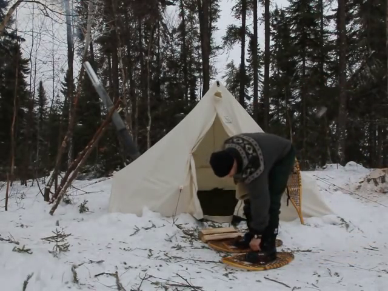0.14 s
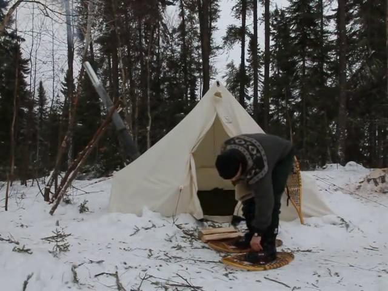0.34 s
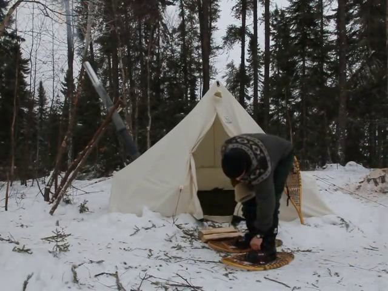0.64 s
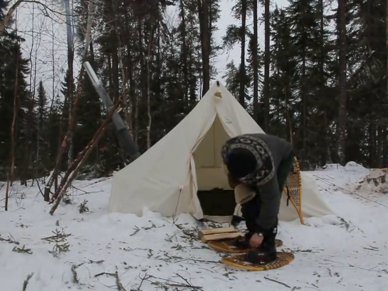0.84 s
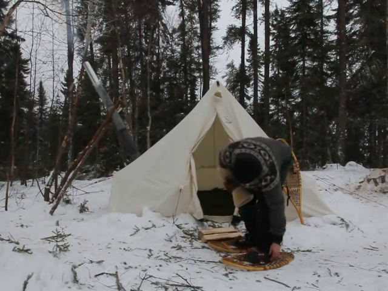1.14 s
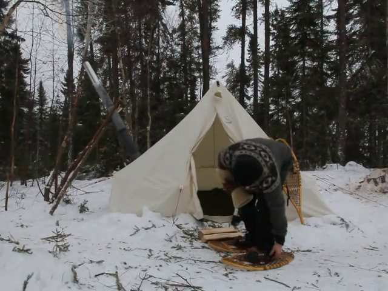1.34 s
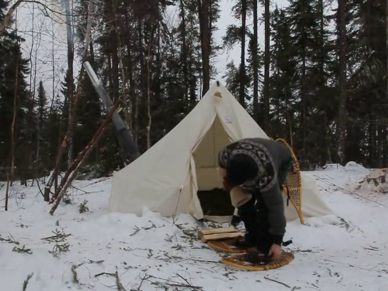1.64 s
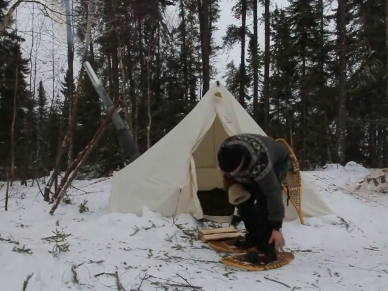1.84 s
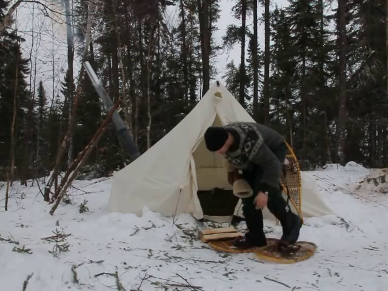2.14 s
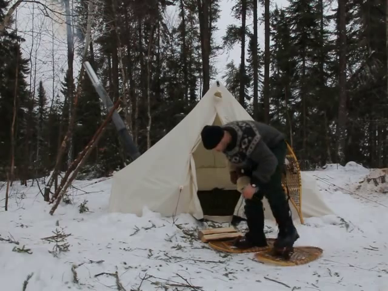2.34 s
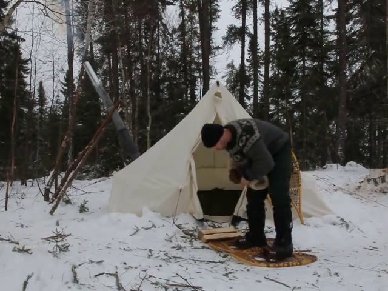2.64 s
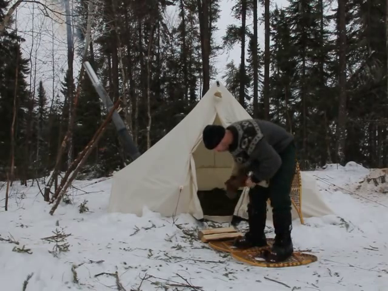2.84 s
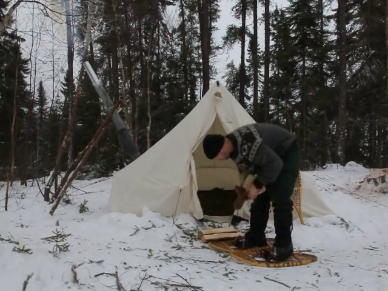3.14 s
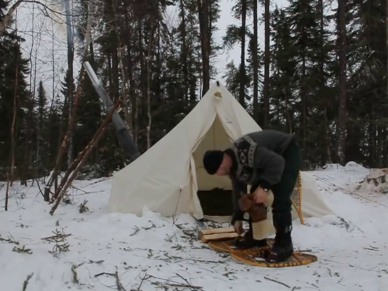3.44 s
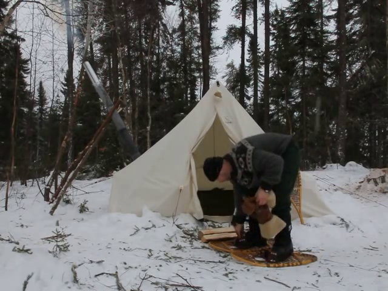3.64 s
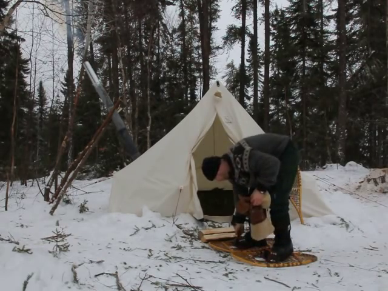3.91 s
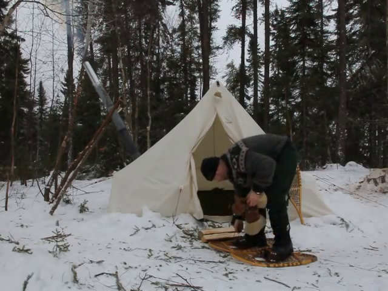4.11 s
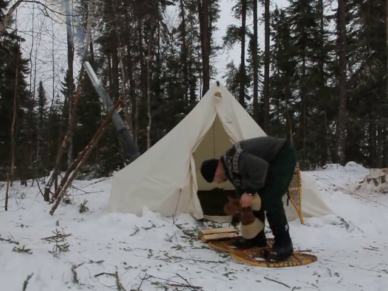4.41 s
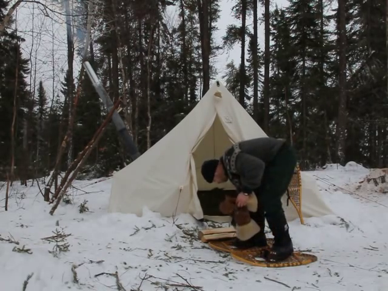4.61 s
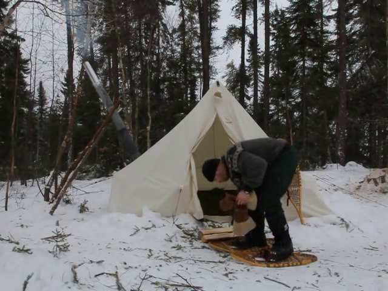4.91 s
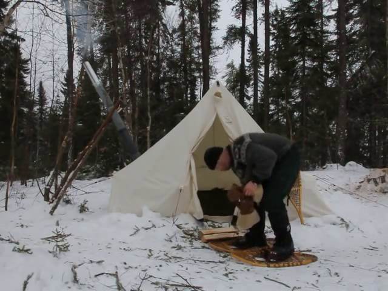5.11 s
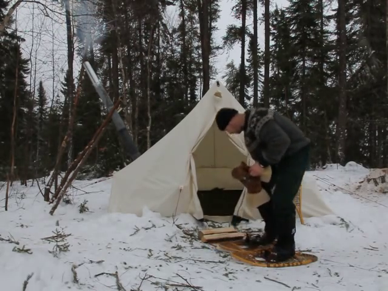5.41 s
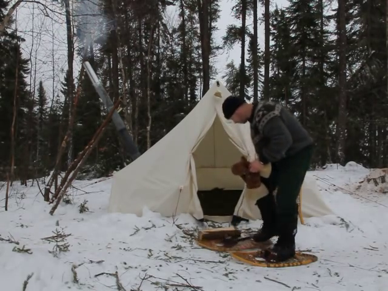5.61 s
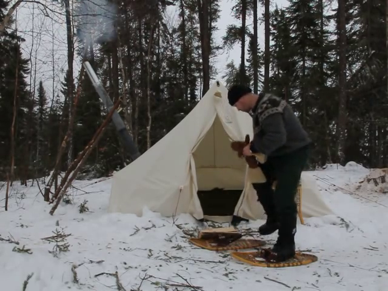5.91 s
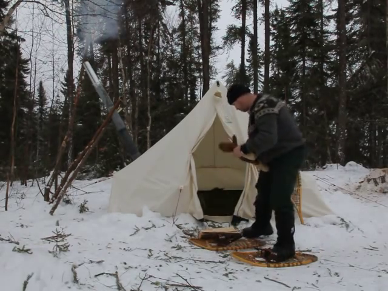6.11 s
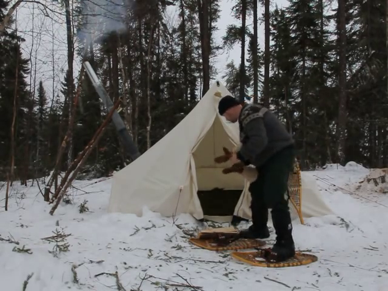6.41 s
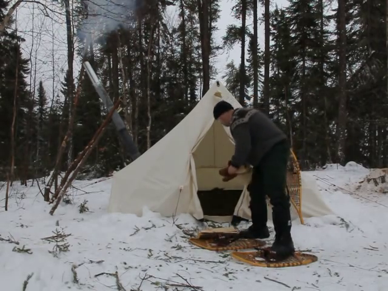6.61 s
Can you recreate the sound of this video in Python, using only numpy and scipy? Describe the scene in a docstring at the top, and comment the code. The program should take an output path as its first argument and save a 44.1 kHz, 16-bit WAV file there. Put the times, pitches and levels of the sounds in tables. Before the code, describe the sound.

Close to the microphone, a snowshoe rocks faintly on snow with light scrapes and small clicks, then sharper binding snaps. A crunchy, hissing shuffle follows, then a quieter stretch of sparse ticks and a soft cloth brush. A second shuffle brings a hard crack and hollow wooden knocks before smaller steps settle. Still, snowy forest, almost no echo.

```python
"""A light scrape and a faint creak of snow come first, close to the microphone, over a soft forest hush.
Someone fastens wooden snowshoes by a tent in a still winter forest, then shuffles round on them.
Frames and bindings snap under load (filtered bursts of grains); crust crunches and powder hisses under
the webbing (coloured grains that follow the feet); clothes brush past (swelling noise); each frame knocks
once (decaying sine modes). The snow swallows almost every echo: only a faint scatter returns."""
import sys
import numpy as np
from scipy import signal
from scipy.fft import rfft, irfft
from scipy.io import wavfile

SR = 44100
rng = np.random.default_rng(int(sys.argv[2]) if len(sys.argv) > 2 else 0)


def put_to_file(sound):
    """Save the sound as 16-bit audio at rate SR, in the file named by the first command-line argument."""
    columns = np.atleast_2d(sound).T  # one column per channel
    safe = np.clip(columns, -1, 1)
    whole_steps = np.round(safe * 32767)
    wavfile.write(sys.argv[1], SR, whole_steps.astype(np.int16))


N = 298116  # samples


def gain_of(db):
    """Decibels to an amplitude factor."""
    return 10 ** (np.asarray(db) / 20)


def evened(x):
    """Scales to rms 1."""
    return x / np.sqrt(np.mean(x ** 2) + 1e-20)


def read(points, hz):
    """Reads a table along a log-frequency axis."""
    point_hz, value = np.transpose(points)
    return np.interp(np.log(hz + 1), np.log(point_hz + 1), value)


def add(mix, start_s, sound):
    """Mixes a sound in at its start time."""
    part = mix[max(round(start_s * SR), 0):][:len(sound)]
    part += sound[:len(part)]


def band(x, low_hz, high_hz, order=2):
    """Causal band-pass; the upper edge stays at least a tenth above the lower."""
    edges = np.clip([low_hz, max(high_hz, low_hz * 1.1)], 10, SR / 2 - 100)
    return signal.sosfilt(signal.butter(order, edges, "band", fs=SR, output="sos"), x)


def coloured(x, spectrum, size=2048):
    """Minimum-phase colour: clicks keep their sharp fronts."""
    hz = abs(np.fft.fftfreq(size, 1 / SR))
    log_gain = np.log(gain_of(read(spectrum, hz)))
    response = np.exp(np.conj(signal.hilbert(log_gain)))
    return signal.oaconvolve(x, np.fft.ifft(response).real)[:len(x)]


def wander(rate_hz):
    """Smooth random drift of rms 1, with nothing faster than rate_hz."""
    slow = np.fft.rfftfreq(N, 1 / SR) < rate_hz
    return evened(irfft(rfft(rng.standard_normal(N)) * slow, N))


def grains(count, per_s, spread_db):
    """Random tiny fractures of either sign, a few much larger than the rest."""
    when, size, sign = rng.random((3, count))
    hit = when < per_s / SR
    out = np.zeros(count)
    excess = np.minimum(-np.log1p(-size[hit]), 3.5)  # exponential chance, capped
    out[hit] = np.sign(sign[hit] - 0.5) * gain_of(spread_db * excess)
    return out


def hush():
    """Soft even air noise with a few faint, fuzzy resonances."""
    # colour of the still air: hz, db_per_hz (relative)
    air_colour = [(25, -44), (70, -13), (120, -10), (200, -3.5), (330, -3), (570, 3), (950, -7),
                  (1800, -8.5), (2900, -14), (5000, -19), (6500, -17.5), (8500, -15.5), (12000, -20.5),
                  (16000, -27)]
    # faint resonances: centre_hz, width_hz, level_db (rms)
    air_tones = [(1390, 100, -60), (2450, 160, -68), (3480, 120, -64.5)]
    level_db = -56.5  # rms
    air = gain_of(level_db) * evened(coloured(rng.standard_normal(N), air_colour))
    for hz, width_hz, db in air_tones:
        tone = band(rng.standard_normal(N), hz - width_hz / 2, hz + width_hz / 2)
        air += gain_of(db) * evened(tone)
    return air


def forest(x):
    """Thin scatter from trunks and canvas, each band dying at its own speed."""
    # how long the trees hold an echo: hz, t60_s
    echo_times = [(150, 0.27), (1200, 0.1), (5000, 0.076), (15000, 0.21)]
    hz, t, bins = signal.stft(grains(SR // 2, 2300, 1.0), SR, nperseg=256)
    decay_db = -60 * t / read(echo_times, hz)[:, None]
    tail = signal.istft(bins * gain_of(decay_db), SR, nperseg=256)[1]
    return signal.fftconvolve(x, tail / np.linalg.norm(tail))[:N]


def swish(row):
    """Fibres rub too finely to be heard singly; the level follows the speed of the arm."""
    start, fastest, end, db, low_hz, high_hz = row
    t = start + np.arange(SR // 2) / SR
    speed = np.interp(t, [start, fastest, end], [0, 1, 0])
    fibres = band(grains(len(t), 14000, 4.2), low_hz, high_hz, order=1)
    rubbing = evened(band(fibres, 74, high_hz * 0.82, order=1))
    return gain_of(db) * speed ** 0.84 * rubbing


def frame(modes, knocks, push_s=0.00178):
    """A blunt push, then the bent wood rings on; the slim frame radiates no deep bass."""
    out, t = np.zeros(N), np.arange(SR // 3) / SR
    ring = sum(gain_of(db - 60 * t / t60) * np.sin(2 * np.pi * hz * t) for hz, db, t60 in modes)
    for start_s, ring_db, push_db, push_hz in knocks:
        push = np.sin(2 * np.pi * push_hz * t) * np.exp(-(t / push_s - 1) ** 2)
        add(out, start_s, gain_of(ring_db) * ring + gain_of(push_db) * push)
    return band(out, 250, 9000)


def footwork():
    """Crunch, hiss and powder gains over time; rest, rocking swells and three moves add as power."""
    # a planted snowshoe rocks while its straps are pulled: middle_s, length_s, crunch_db, hiss_db
    rocks = [(0.01, 0.12, -47, -45.5), (0.162, 0.17, -59, -50), (0.319, 0.14, -56, -49.5),
             (0.652, 0.25, -47, -46), (1.097, 0.16, -50, -47.5), (1.178, 0.11, -57, -44),
             (1.273, 0.3, -55, -52.5), (1.47, 0.38, -48.5, -45), (2.955, 0.19, -48.5, -54),
             (3.25, 0.47, -58.5, -57.5), (3.693, 0.27, -56.5, -49), (3.898, 0.081, -59, -50.5),
             (4.196, 0.16, -52.5, -56), (4.316, 0.066, -49, -51), (4.786, 0.064, -61, -46.5),
             (4.93, 0.15, -51, -49)]
    # moves of the feet: time_s, crunch_db under weight, sliding hiss_db, powder_db (relative to the slide)
    step_out = [(1.63, -56, -51, 2), (1.7, -49, -43.5, -9), (1.79, -38.5, -34.5, -5),
                (1.88, -39.5, -40.5, -3), (1.95, -40, -30.5, 0), (2.04, -35, -33.5, -3.5),
                (2.1, -35, -41.5, 6), (2.19, -36, -35, 2.5), (2.23, -41.5, -35.5, 5.5),
                (2.32, -36, -31.5, -2.5), (2.4, -47.5, -38, 0.5), (2.45, -34, -42, 0),
                (2.52, -42.5, -39.5, 1), (2.58, -35.5, -33.5, -7), (2.62, -41, -41.5, -3),
                (2.69, -42, -40.5, -4), (2.85, -47, -49, 0), (2.91, -58, -62, -10)]
    # same columns
    step_round = [(5.02, -65, -61, -1), (5.08, -41, -35, -5.5), (5.12, -46, -48.5, -6),
                  (5.16, -40, -32.5, -5), (5.23, -41.5, -38.5, -6), (5.35, -46, -40, -0.5),
                  (5.47, -33.5, -35, -3), (5.555, -59, -45.5, -1), (5.61, -41, -38.5, -5),
                  (5.66, -52, -41, -1), (5.72, -56, -36, 11), (5.77, -56, -48.5, -9), (5.82, -56, -50.5, 2),
                  (5.93, -41.5, -43.5, -7), (6.01, -54.5, -64, -5)]
    # same columns
    settle = [(6.11, -66, -63, 1), (6.22, -43, -46.5, -2), (6.3, -42.5, -55, -11), (6.335, -52, -68, -4),
              (6.39, -41.5, -50, -5), (6.48, -41, -52, -5), (6.55, -58, -58, -1), (6.64, -47, -49, 1),
              (6.69, -52, -51, -5), (6.76, -48.5, -49, -3)]
    rest_crunch_db, rest_hiss_db = -60, -60  # before a swell of 0.98: the snow never quite rests
    rock_powder_db = -5  # relative to the slide
    t = np.arange(N) / SR
    moves = [(0.98, rest_crunch_db, rest_hiss_db, rock_powder_db, t >= 0)]
    for middle, length, crunch_db, hiss_db in rocks:
        during = abs(t - middle) < length / 2
        swell = np.cos(np.pi * (t[during] - middle) / length) ** 2
        moves.append((swell, crunch_db, hiss_db, rock_powder_db, during))
    for curve in (step_out, step_round, settle):
        time_s, *columns = np.transpose(curve)
        during = (t >= time_s[0]) & (t <= time_s[-1])
        levels = [np.interp(t[during], time_s, column) for column in columns]
        moves.append((1, *levels, during))
    power = np.zeros((3, N))
    for swell, crunch_db, hiss_db, powder_db, during in moves:
        # slide and powder share the power of the hiss
        slide = gain_of(hiss_db) / np.hypot(1, gain_of(powder_db))
        gains = (gain_of(crunch_db), slide, slide * gain_of(powder_db))
        for layer, gain in zip(power, gains):
            layer[during] += (swell * gain) ** 2
    return np.sqrt(power)


def crumbs(low_hz, high_hz, per_s, cycles, spread_db, count=16):
    """Lumps of many sizes break, each ringing for a few cycles at its own pitch."""
    t, out = np.arange(600) / SR, np.zeros(N)
    for hz in np.geomspace(low_hz, high_hz, count):
        age = t * hz / cycles
        ringing = age * np.exp(-2 * age) * np.sin(2 * np.pi * hz * t)
        lump = np.sqrt(hz) * evened(ringing)
        out += signal.oaconvolve(grains(N, per_s / count, spread_db), lump)[:N]
    return evened(out)


def snow(weight, slide, powder):
    """Weight breaks the crust in coarse clumps; sliding rubs countless fine grains."""
    # packed snow giving way: hz, db_per_hz (relative)
    crunch_colour = [(40, -45), (110, -26.5), (200, -5), (320, -2.5), (600, 2), (1000, -1), (1500, 0),
                     (2000, -8.5), (2800, -9.5), (6000, -41)]
    # snow sliding under the webbing: hz, db_per_hz (relative)
    slide_colour = [(900, -24), (1700, 0), (2400, -2), (3800, 1.5), (5200, -2), (6500, -2), (8000, -13.5),
                    (12000, -46)]
    # fine powder: hz, db_per_hz (relative)
    powder_colour = [(4000, -23.5), (6000, -1.5), (7000, 0.5), (8300, 0), (9600, -2), (12000, -5),
                     (14000, -9), (16000, -13)]
    stutter_db, stutter_hz = 1.5, 29.4  # a sliding frame catches and frees: rms depth, fastest rate
    clumps_db = 3.2 * wander(110)  # the snow sticks and gives by turns
    fractures = evened(grains(N, 800, 5.0) * gain_of(clumps_db))
    coarse = fractures + 0.34 * crumbs(670, 2410, 320, 1.85, 2.5)
    coarse += 0.45 * rng.standard_normal(N)
    fine = evened(grains(N, 7000, 3.8) * gain_of(0.98 * clumps_db))
    fine += 0.5 * fractures
    fine += 0.6 * crumbs(2000, 14000, 800, 2.4, 3.1)
    fine *= gain_of(stutter_db * wander(stutter_hz))
    crunch = weight * evened(coloured(coarse, crunch_colour))
    sliding = slide * evened(coloured(fine, slide_colour))
    return crunch + sliding + powder * evened(coloured(fine, powder_colour))


def voiced(drives, row, span_s, top_hz=720, skirt=0.34):
    """A fracture thuds in the snow pack, rings in the frame, and has a sharp edge and an icy fizz."""
    _, level_db, _, ring_hz, thud_db, bright_db = row
    # a heavy thud sinks in pitch (23.5 Hz per dB), a bright edge rises (107 Hz per dB)
    thud_hz = max(475 - 23.5 * max(thud_db + 2, 0), 323)
    edge_hz = 3500 + 107 * max(bright_db - 4.5, 0)
    fizz_db = 1.17 * bright_db - 3.5  # the fizz follows the edge
    low_hz = thud_hz ** 2 / top_hz  # a deeper thud spreads further down from the same top
    thud = band(drives[0], low_hz, top_hz, order=3)
    thud += skirt * band(drives[0], max(low_hz * 0.44, 117), low_hz, order=3)
    ring = band(drives[1], ring_hz * 0.68, ring_hz * 1.37)
    ring += 0.5 * band(drives[1], ring_hz * 0.94, ring_hz * 0.84, order=1)
    edge = band(drives[2], edge_hz * 0.714, 6340, order=3)
    edge += 2.0 * band(drives[2], edge_hz * 0.737, edge_hz * 1.145)
    fizz = band(drives[2], 5700, 13200, order=3)
    fizz += 3.5 * band(drives[2], 7500, 8580, order=1)
    parts = ((thud, thud_db), (ring, 0), (edge, bright_db), (fizz, fizz_db))
    # each part's energy is set as if spread evenly over span_s
    return sum(gain_of(level_db + db) * part * np.sqrt(span_s * SR / np.sum(part ** 2))
               for part, db in parts)


def scuff(row, release_s=0.002):
    """A dense run of tiny slips that holds its level and then lets go."""
    t = np.arange(SR // 12) / SR
    hold_s = row[2]
    shape = (1 - np.exp(-t / 0.00026)) * np.exp(-np.maximum(t - hold_s, 0) / release_s)
    drive = evened(grains(len(t), 5400, 3.1)) * shape
    return voiced([drive] * 3, row, hold_s)


def snap(row, crack=6.5, sharpness=0.42, tail_db=-25, tail_s=0.011, thud_stretch=1.4):
    """One main crack amid a dying run of smaller ones; level is the rms over a hundredth of a second."""
    t = np.arange(SR // 12) / SR
    length = max(row[2], 0.0005)
    run = evened(grains(len(t), 9000, 1.23))
    main = crack * (np.arange(len(t)) == int(min(length * 0.4, 0.001) * SR))
    tail = gain_of(tail_db) * np.exp(-t / tail_s)
    onset = 1 - np.exp(-t / 0.00015)
    # thud, ring, and edge with fizz: the deeper the part, the longer it lasts
    decays = (length * thud_stretch, length * 1.22, length * 0.82)
    shapes = [(np.exp(-(t / decay) ** 0.82) + tail) * onset for decay in decays]
    drives = [run * shape + share * main for shape, share in zip(shapes, (1, 1, sharpness))]
    return voiced(drives, row, 1 / 100)


def small_snaps(weight, count=400):
    """Rows for small cracks that come by chance, in random colours, louder under more weight."""
    per_s, length_s, thud_db = 22, 0.0013, -5.5
    times = np.cumsum(rng.exponential(1, count)) / per_s
    chances = 2 * rng.random((count, 3)) - 1
    rows = []
    for start_s, (size, pitch, bright) in zip(times, chances):
        if start_s * SR < N:
            weight_db = 20 * np.log10(weight[int(start_s * SR)])
            level_db = weight_db - 2 + 2 * size
            ring_hz = 1400 * 2 ** (0.26 * pitch)
            rows.append((start_s, level_db, length_s, ring_hz, thud_db, 0.5 + 5 * bright))
    return rows


def scene():
    """Feet, frames, clothes and snow close by, in front of the quiet forest."""
    # sleeves and mittens brush past: start_s, fastest_s, end_s, level_db, low_edge_hz, high_edge_hz
    swishes = [(2.95, 3.12, 3.24, -49.5, 400, 5430), (6.15, 6.245, 6.34, -41, 440, 4860),
               (6.25, 6.305, 6.33, -37.5, 644, 2630)]
    # modes of the left wooden frame: pitch_hz, level_db (relative), t60_s
    left_modes = [(307, 1.5, 0.12), (1024, -0.5, 0.11), (1452, -2, 0.12), (2120, -25, 0.11),
                  (2350, -35, 0.46), (2930, -21, 0.08), (2800, -4, 0.058)]
    # modes of the right one, same columns
    right_modes = [(321, -2, 0.069), (505, -8, 0.1), (1130, 3.5, 0.085), (1410, -15, 0.073),
                   (2260, -27, 0.16)]
    # the left frame knocks: start_s, ring_level_db, push_level_db, push_hz
    left_knocks = [(5.496, -23.5, -48, 330)]
    # the right frame knocks, same columns
    right_knocks = [(5.637, -29.5, -15, 500)]
    # quick even scrapes of strap, cloth and frame: start_s, ring_level_db, length_s, ring_hz,
    # thud_db and brightness_db (both relative to the ring)
    scuffs = [(0.013, -51, .02, 1110, -7, 7.5), (0.071, -47.5, 0.025, 1420, -16, 3),
              (1.745, -25.5, .026, 1470, -19.5, 1), (2.157, -28, .03, 910, -16, -10),
              (2.678, -39.5, 0.0074, 1180, 3, 3.5), (2.76, -31.5, 0.014, 1480, -4.5, -4),
              (4.918, -33.5, .025, 1460, -9, 0), (5.5, -34.5, 0.024, 1270, 0, 0),
              (5.569, -40.5, 0.0067, 1300, 0.5, 6.5), (5.787, -45, 0.0071, 1460, -7, 6),
              (6.13, -43.5, 0.021, 1390, -7.5, -1), (6.494, -34, 0.012, 1330, -2.5, -7.5)]
    # loud cracks of crust, frame and binding, same columns; the length scales the decay
    snaps = [(0.038, -42, .0036, 1000, -14, -10), (0.5071, -55, 0.0022, 1320, 9.5, -6),
             (0.637, -38.5, 0.0042, 1270, -5.5, -2), (0.7209, -43.5, .002, 1590, -4.5, -8),
             (0.9107, -46, .0022, 830, -15, -22), (1.0262, -37, 0.0027, 1430, -1.5, -7.5),
             (1.0647, -21, 0.0031, 1200, -3.5, -7.5), (1.096, -38, 0.0011, 1350, -19, -19),
             (1.107, -46, 0.0022, 1330, -13, 2), (1.1372, -36, 0.0022, 1310, -11, -23),
             (1.1536, -40.5, 0.0027, 1510, -4, 2.5), (1.171, -34.5, 0.001, 1300, -25, -6),
             (1.2327, -32, 0.0027, 1370, -11, -2.5), (1.265, -45.5, .0016, 1140, 2, 2.5),
             (1.2828, -39, 0.00061, 1310, -9, -3.5), (1.3684, -62, .0017, 1370, -3, 19),
             (1.4012, -44.5, 0.0014, 1450, 2, 17.5), (1.4132, -30.5, 0.0014, 1360, -19, -8),
             (1.43, -43, .001, 1410, -14, -19), (1.444, -32.5, 0.0039, 1220, -10, -6.5),
             (1.4776, -20.5, .0016, 920, -9, -8), (1.502, -30, 0.0013, 1410, -11, -8),
             (1.5213, -32.5, .0033, 1370, -7, -13), (1.5334, -43.5, 0.0019, 840, -13, 16),
             (1.536, -42, .002, 1490, -2, 16.5), (1.5842, -44.5, 0.00088, 1560, -18, 4.5),
             (1.6035, -42.5, .003, 1580, -15, 0.5), (1.7248, -33, .0028, 1570, -5, -4),
             (1.7421, -24.5, 0.00095, 1320, -2, -4.5), (1.8135, -34.5, .0026, 1830, -10, -2),
             (1.8329, -33.5, .001, 1840, -19, 3), (1.8684, -31, 0.0016, 1740, -4.5, 3),
             (1.8833, -40, 0.00089, 1050, 3.5, -2), (2.017, -28, 0.0045, 1380, -21, -4),
             (2.0394, -26.5, 0.0072, 1390, -21, -1), (2.0925, -21.5, 0.012, 970, -7, -8.5),
             (2.1092, -24, 0.0021, 935, -10, -11), (2.1418, -28.5, 0.0056, 1110, -2, -4),
             (2.1782, -25.5, 0.0024, 1450, -7, -16), (2.2031, -38, 0.0021, 880, 7, 2),
             (2.261, -31.5, 0.00063, 1360, -3.5, -7.5), (2.319, -33.5, 0.0037, 1310, -5, 1.5),
             (2.4531, -31.5, 0.0024, 1330, -18, -11), (2.4872, -29.5, .008, 1250, -3, -5.5),
             (2.5273, -30, 0.0033, 1430, -6.5, -8), (2.5884, -33, 0.0037, 1750, -20, 3),
             (2.632, -40, .0028, 1150, -1.5, 7), (2.6734, -30, 0.0038, 1490, 3, -5.5),
             (2.7423, -31, 0.0014, 1430, -7.5, -23), (2.7832, -37, 0.0026, 1230, -9, -12),
             (2.806, -31.5, 0.003, 1220, -4, -7), (2.8368, -32.5, 0.0029, 1570, -4.5, -7.5),
             (2.851, -39, .0007, 1470, -26, -20), (2.8801, -38.5, 0.0026, 1530, -26, -16),
             (3.2915, -38, 0.0041, 1300, -6.5, -2), (3.3306, -40.5, 0.00093, 1160, -9, -9.5),
             (3.3653, -41.5, 0.0012, 1410, -21, -9), (3.4027, -37.5, 0.00084, 1350, -8, -12),
             (3.4222, -41.5, 0.0019, 1200, -8, -5), (3.4873, -42, .0017, 1190, -30, -2.5),
             (3.718, -61.5, .004, 905, 10.5, -12), (3.8676, -47.5, 0.0019, 1500, -9, -2.5),
             (3.9, -60.5, .0007, 1330, -6, 10), (4.1618, -30.5, 0.0012, 1580, -23, -8),
             (4.335, -47, 0.0011, 1600, -9, 1.5), (4.5153, -41.5, .001, 1590, -16, -4),
             (4.5537, -48, .003, 1160, -4, -1.5), (4.716, -59, .003, 900, 7, -2),
             (4.7725, -55, 0.0017, 1420, 4.5, 14), (4.904, -44.5, 0.0032, 1040, -24, 1),
             (4.991, -40.5, 0.0016, 1050, -13, -9), (5.1404, -39, .002, 1510, -16, 3.5),
             (5.1693, -33, 0.0041, 1130, -18, -3), (5.189, -16, .004, 1620, -7.5, 0),
             (5.22, -41.5, .0012, 1460, -6, 5.5), (5.392, -24.5, 0.0021, 1370, -3, 1.5),
             (5.4948, -36.5, .0015, 1250, 5.5, 13.5), (5.6051, -40, 0.002, 1540, 4, 7.5),
             (5.6357, -33.5, .01, 1010, 0, -6), (5.724, -61, 0.00083, 1350, 0, 21),
             (5.8318, -63.5, 0.0013, 1400, -9, 22.5), (5.8553, -35.5, .0033, 1240, -8.5, -8.5),
             (5.8977, -32, 0.0031, 1380, -9.5, -2.5), (5.9323, -35, 0.0015, 1310, -16, -9),
             (5.9785, -40, .0012, 1330, -6.5, -7.5), (6.0731, -36.5, 0.0023, 1290, -9.5, -8),
             (6.34, -45.5, 0.00064, 1580, -7, 0), (6.367, -42, 0.0023, 1390, -1, -6),
             (6.4386, -35.5, 0.0032, 1290, -3, -3.5), (6.6168, -32.5, .0013, 1750, -15, -4.5)]
    weight, slide, powder = footwork()
    near = frame(left_modes, left_knocks) + frame(right_modes, right_knocks)
    near += snow(weight, slide, powder)
    sources = ((swishes, swish), (scuffs, scuff), (small_snaps(weight), snap), (snaps, snap))
    for table, source in sources:
        for row in table:
            add(near, row[0], source(row))
    return (near + gain_of(-28.0) * forest(near) + hush())[None]


def record(dry):
    """The recorder clips at its ceiling, then limits the band with a linear-phase low-pass."""
    ceiling, edge_hz = 0.9, 15950  # ceiling as a share of full scale
    held = np.clip(dry, -ceiling, ceiling)
    low_pass = signal.firwin(255, edge_hz, window=("kaiser", 9), fs=SR)
    return signal.oaconvolve(held, low_pass[None], "same")


dry = scene()
out = record(dry)
put_to_file(out)
```